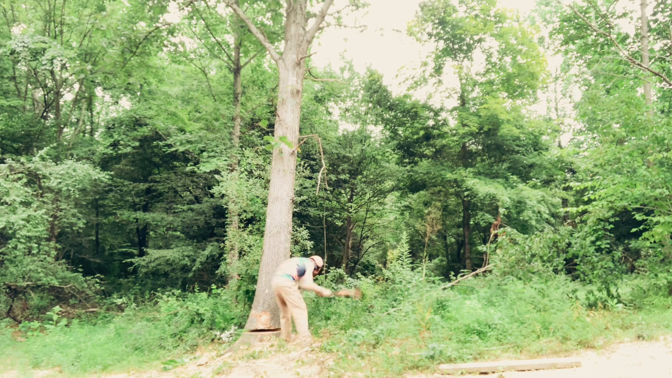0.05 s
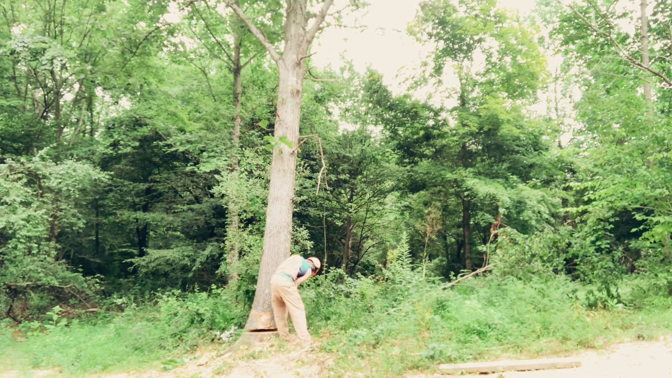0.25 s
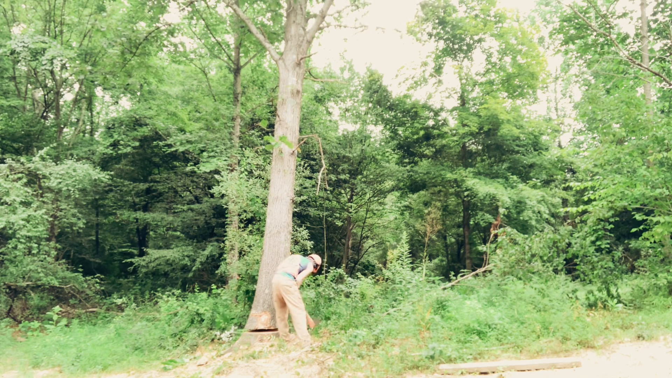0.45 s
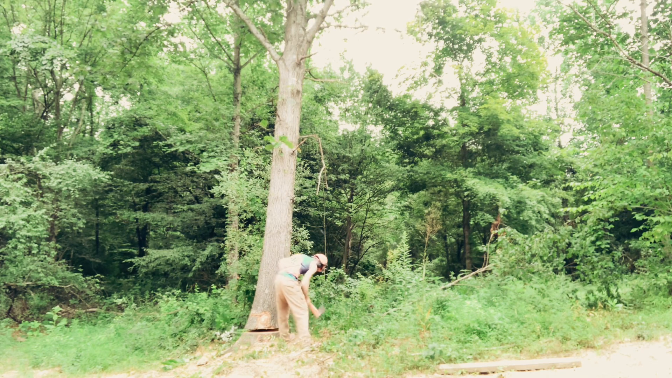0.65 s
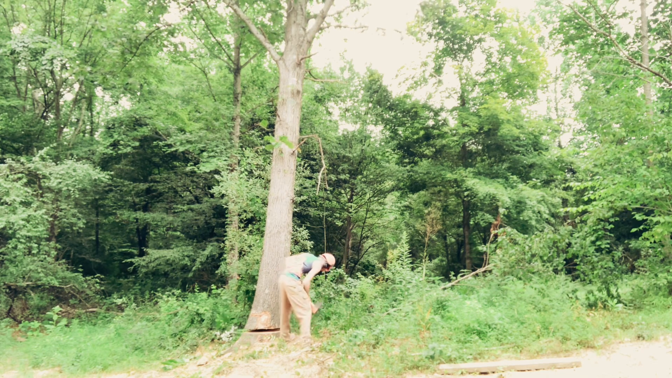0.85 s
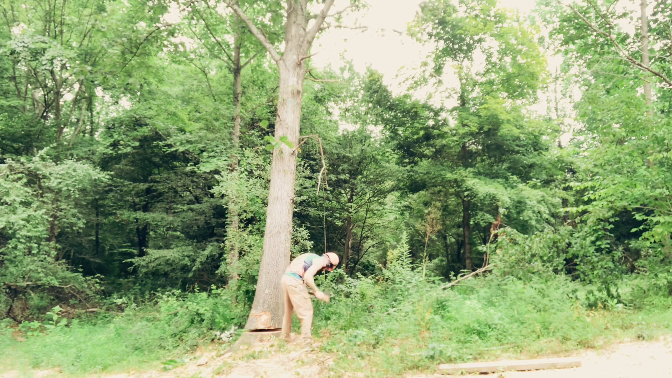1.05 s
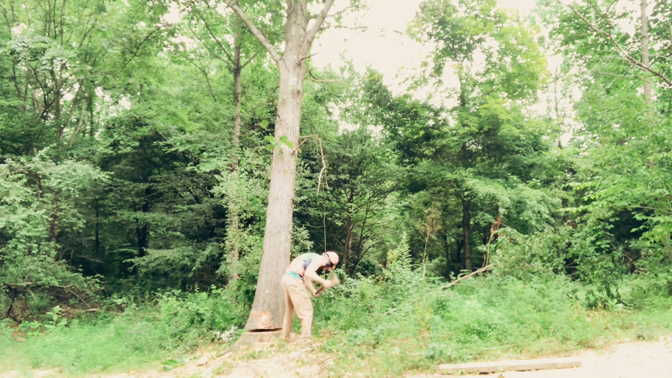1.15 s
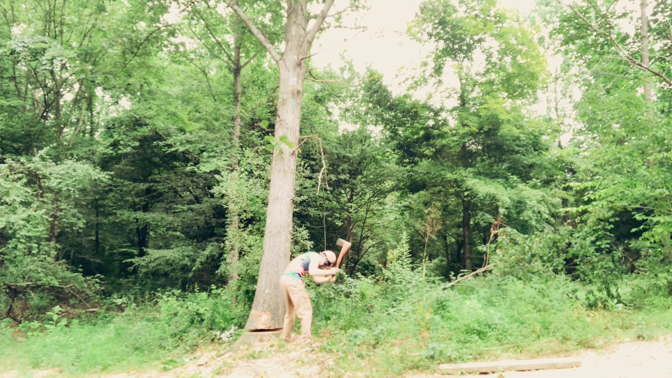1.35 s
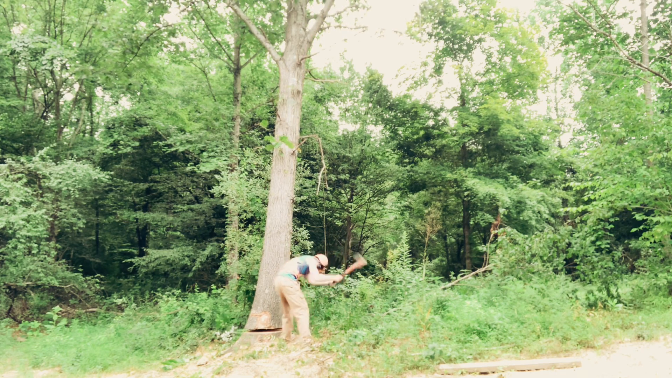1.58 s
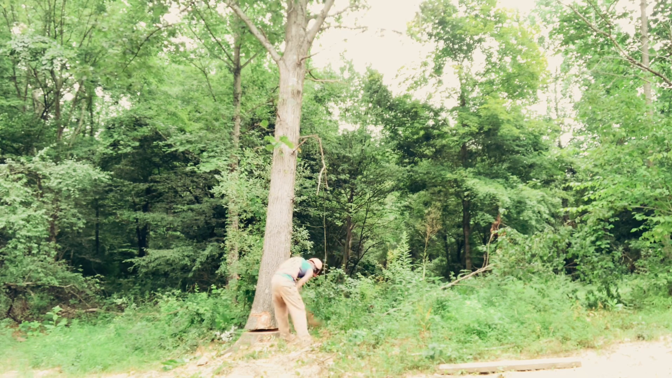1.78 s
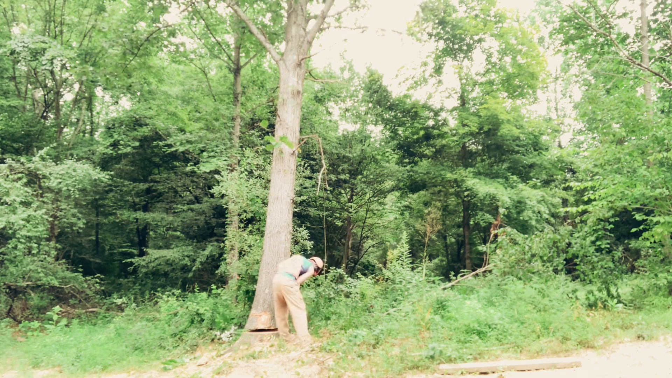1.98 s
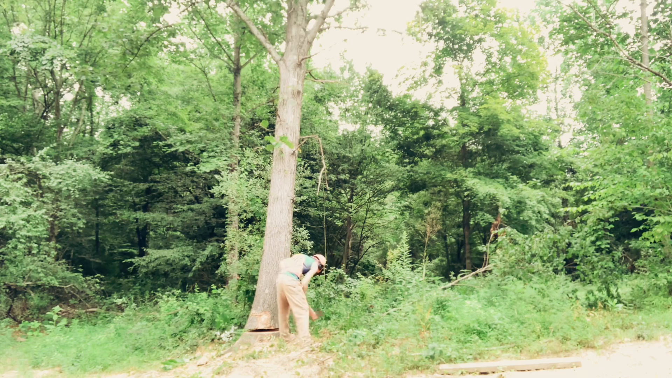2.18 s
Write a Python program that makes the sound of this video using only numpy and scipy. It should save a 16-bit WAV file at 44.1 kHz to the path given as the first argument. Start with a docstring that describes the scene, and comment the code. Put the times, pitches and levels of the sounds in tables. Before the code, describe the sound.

Hammer on a wedge in a tree at a wood's edge, heard from a distance. At 0.2 s a sharp steely crack and short woody knock, echo scattering through the trees. From 0.5 to 1.4 s faint rustling, small twig snaps and a hand sliding on the handle. A barely audible note at 1.6 s, second blow at 1.86 s, snaps near 2.1 s. Quiet low rumble throughout.

```python
"""Two hammer blows on a wedge in the cut of a tall tree at the edge of a wood, heard from some way off.
Each blow is a noisy steel tick, ringing steel and wood tones, and a long scattered echo made of fading noise.
Between the blows, grainy noise makes clothes and grass rustle, and noise in moving resonances makes a hand
slide on the handle; between and after the blows, short bursts make twigs or grass snap. A faint note comes
before the second blow. Under it all lies a quiet, patchy rumble of low-heavy noise."""
import sys
import numpy as np
from scipy import signal
from scipy.fft import rfft, irfft
from scipy.io import wavfile
from scipy.ndimage import uniform_filter1d

SR = 44100
rng = np.random.default_rng(int(sys.argv[2]) if len(sys.argv) > 2 else 0)


def wav_out(sig):
    """Save sig, one row per channel (or a flat mono array), as 16-bit PCM at SR to the path in sys.argv[1]."""
    wavfile.write(sys.argv[1], SR, np.round(np.clip(np.atleast_2d(sig).T, -1, 1) * 32767).astype(np.int16))


N = 97020  # samples, 2.2 s

# How alike left and right are in echo and rustle: f/Hz, likeness (1 same, 0 unrelated, -1 opposite)
ECHO_LIKENESS = [(60, 0.85), (180, 0.77), (550, -0.11), (1650, -0.45), (4970, 0.17), (15000, -0.14)]
# Tone colour of rustle and snaps: f/Hz, relative level per Hz/dB
RUSTLE_COLOUR = [(240, -18), (400, -3.5), (690, -11), (858, -3.5), (1750, -7.5), (2550, -14), (4260, -9.5),
                 (6090, -20), (8580, -5), (10000, -30.5), (11500, -10.5), (15300, -29), (16500, -36)]


def gain_of(db):
    """Turns decibels into a gain."""
    return 10 ** (np.asarray(db) / 20)


def evened(x):
    """Scales a sound to an rms of 1."""
    return x / np.sqrt(np.mean(x ** 2) + 1e-20)


def read(points, hz):
    """Reads a table between its rows, on a log-frequency axis."""
    f, value = np.transpose(points)
    return np.interp(np.log(hz + 1), np.log(f + 1), value)


def level(table):
    """Turns a table of times and decibels into a gain curve, silent outside the table."""
    rows = np.array(table)
    return gain_of(np.interp(np.arange(N) / SR, rows[:, 0], rows[:, 1], -200, -200))


def add(mix, start, sound):
    """Mixes a stereo sound in at a start time in seconds."""
    part = mix[:, round(start * SR):][:, :sound.shape[1]]
    part += sound[:, :part.shape[1]]


def hiss(colour, likeness, patchy_db, t60=None, size=512):
    """Stereo noise from random short-time spectra: rms 1, or fading from about there if t60 (s) is given."""
    hop = size // 4
    frames, hz = N // hop + 5, np.fft.rfftfreq(size, 1 / SR)
    a, b, c, d, patches = rng.standard_normal((frames, len(hz), 5)).T
    # Smoothing over 9 frequency bins and 7 frames makes louder and softer patches
    patches = uniform_filter1d(patches, size=9, axis=0)
    patches = evened(uniform_filter1d(patches, size=7, axis=1))
    alike = np.clip(read(likeness, hz), -1, 1)[:, None]
    left = a + 1j * b
    right = alike * left + np.sqrt(1 - alike ** 2) * (c + 1j * d)
    spectra = np.array([left, right]) * gain_of(read(colour, hz)[:, None] + patchy_db * patches)

    def to_sound(z):
        """Joins the overlapping short spectra into a waveform."""
        return signal.istft(z, nperseg=size, noverlap=size - hop)[1][:, :N]

    steady = to_sound(spectra)
    if t60 is None:
        return evened(steady)
    # Each frequency falls by 60 dB in its own time
    fade_db = -60 * np.arange(frames) * hop / SR / read(t60, hz)[:, None]
    return to_sound(spectra * gain_of(fade_db)) / steady.std()


def resonate(x, hz, width_hz):
    """A moving resonance: shift its pitch down to zero, smooth twice, shift back."""
    turn = np.exp(2j * np.pi * np.cumsum(hz * np.ones(N)) / SR)
    r = np.exp(-np.pi * width_hz / SR)
    smooth = signal.lfilter([(1 - r) ** 2], [1, -2 * r, r ** 2], x / turn)
    return 2 * (turn * smooth).real


def rumble():
    """A quiet, low-heavy, patchy noise that swells and sinks slowly."""
    # Tone colour: f/Hz, relative level per Hz/dB
    floor_colour = [(15, -51.5), (25, -22), (65, -4.5), (159, -16.5), (208, -14), (266, -15.5),
                    (617, -25.5), (746, -23.5), (1430, -28), (2600, -37.5), (9850, -39.5), (12900, -56),
                    (16500, -67.5)]
    # Left-right match: f/Hz, likeness from -1 to 1
    floor_likeness = [(60, 0.84), (180, 0.93), (550, 0.67), (1650, 0.36), (4970, -0.15), (15000, -0.07)]
    # Slow swell: t/s, level change/dB
    floor_swell = [(0, -6), (.6, 1), (1.2, 0.5), (1.5, -3.5), (2.2, 7)]
    noise = hiss(floor_colour, floor_likeness, patchy_db=4.0, size=2048)
    return gain_of(-61.5) * level(floor_swell) * noise


def tick(tick_db):
    """The dry crack of steel on the wedge: coloured noise that dies fast, partly shared by both sides."""
    # Tone colour: f/Hz, relative level per Hz/dB
    crack_colour = [(1500, -26.5), (2500, -4), (3100, -5), (4500, 0), (6800, -14.5), (8200, -2.5),
                    (9900, -16), (12000, -6.5), (14000, -16), (15100, -9.5), (16500, -27)]
    base_db, t60_s, rise_s = -17.5, .012, .0012
    likeness, left_lag_s = .9, .00009
    t, hz = np.arange(4096) / SR, np.fft.rfftfreq(4096, 1 / SR)
    a, b = rfft(rng.standard_normal((2, 4096)))
    left = a * np.exp(-2j * np.pi * hz * left_lag_s)
    right = likeness * a + np.sqrt(1 - likeness ** 2) * b
    crack = evened(irfft(np.array([left, right]) * gain_of(read(crack_colour, hz))))
    return crack * np.minimum(t / rise_s, 1) * gain_of(base_db + tick_db - 60 * t / t60_s)


def steel_ring(ear_times, ring_db):
    """The hammer head rings as high sine tones that fade quickly."""
    # Tones of the hammer head: f/Hz, level before the blow's ring setting/dB, time to fall 60 dB/s
    steel_tones = [(8190, -26, 0.0308), (8700, -31, 0.021)]
    return sum(gain_of(ring_db + db - 60 * ear_times / t60) * np.sin(2 * np.pi * hz * ear_times)
               for hz, db, t60 in steel_tones)


def wood_knock(ear_times, pitch, off_centre):
    """Wedge, trunk and ground sound as fading sine tones; the lowest swell most slowly."""
    # Tones: f before the pitch factor/Hz, level/dB, change when fully off-centre/dB,
    # time to fall 60 dB/s, swell time/s, left minus right/dB
    wood_tones = [(44, -33.5, -3, 0.46, .03, -1), (62, -33.5, 1, 0.44, .02, -1),
                  (72, -10.5, -1.5, 0.087, 0.0081, 0.5), (147.1, -10.5, -2, 0.071, 0.004, -1.5),
                  (237.4, -15, 3, 0.065, .005, 0.5), (346.6, -5, 2, 0.038, 0.0026, -2.5),
                  (480, -17, 2, 0.054, .003, 0.5), (633, -14.5, 6, 0.041, 0.00052, 0),
                  (784, -16, 7, 0.057, .001, -1), (977, -6.5, -4, 0.075, .001, 2.5),
                  (1150, -6.5, -3.5, 0.024, 0.00049, 4), (1223, -5, 3, 0.02, 0.00027, 3.5),
                  (1525, -16, -1.5, 0.039, 0.00029, -9), (1950, -17.5, -3, .04, .0004, 4),
                  (2400, -24.5, -4, 0.02, 0.0012, -3.5)]
    late = (ear_times - .001).clip(0)  # the wood answers 1 ms after the steel touches
    knock = 0
    for hz, db, shift_db, t60, swell_s, pan_db in wood_tones:
        side_db = np.array([[pan_db], [-pan_db]]) / 2
        fade = gain_of(db + off_centre * shift_db - 60 * late / t60 + side_db)
        swell = (1 - np.exp(-late / swell_s)) ** 2
        knock = knock + fade * swell * np.sin(2 * np.pi * hz * pitch * late)
    return knock


def wood_echo(echo_db, bright_db, treble_db):
    """Many overlapping reflections, heard as noise: near trunks fade soon, the deep wood slowly."""
    # Tone colours of near trunks and deep wood: f/Hz, relative level per Hz/dB
    near_colour = [(24, -38), (40, -5.5), (118, -10.5), (245, -5), (690, -11), (981, -4.5), (1060, -4),
                   (1990, -17), (2370, -22), (6660, -34), (8360, -27), (10200, -39), (12800, -30),
                   (13800, -75), (16500, -107)]
    far_colour = [(24, -41), (40, 1.5), (164, -10.5), (206, -15.5), (358, -3), (485, -20), (844, -1.5),
                  (1750, -9.5), (2370, -12), (3730, -21.5), (8570, -24.5), (10200, -39.5), (12500, -33),
                  (15300, -46), (16500, -61.5)]
    # Their fading: f/Hz, time to fall 60 dB/s
    near_t60 = [(60, 0.3), (150, .25), (300, 0.28), (1000, 0.44), (2000, 0.5), (4000, 0.65), (10000, 0.44)]
    far_t60 = [(60, 1.5), (200, 0.79), (400, 1.12), (1000, 1.73), (2400, 1.39), (4000, 1.05), (10000, 1.1)]
    # Left-right match of the near echo: f/Hz, likeness from -1 to 1
    near_likeness = [(60, 0.046), (180, 0.93), (550, 0.18), (1650, -0.18), (4970, -0.0), (15000, -0.36)]
    patchy_db, rise_s = 1.18, .006
    echo = gain_of(-16) * hiss(near_colour, near_likeness, patchy_db, near_t60)
    echo = echo + gain_of(-31.5) * hiss(far_colour, ECHO_LIKENESS, patchy_db, far_t60)
    # Each blow changes a band around 2340 Hz and the treble above about 3100 Hz
    hz = np.fft.rfftfreq(N, 1 / SR)
    bright_band = np.exp(-((hz - 2340) / 400) ** 2)
    treble = 1 / (1 + (3100 / (hz + 1)) ** 4)
    echo = irfft(rfft(echo) * gain_of(bright_db * bright_band + treble_db * treble), N)
    rise = (1 - np.exp(-np.arange(N) / SR / rise_s)) ** 2
    return gain_of(echo_db) * rise * echo


def blow(start, db, tick_db, ring_db, pitch, off_centre, echo_db, bright_db, treble_db):
    """One strike sets off the tick, the steel ring, the wood knock and the echo."""
    left_lag_s = .00012  # ring and knock reach the left side a little later
    t = np.arange(N) / SR
    ear_times = np.array([t - left_lag_s, t]).clip(0)
    sound = steel_ring(ear_times, ring_db) + wood_knock(ear_times, pitch, off_centre)
    sound = sound + wood_echo(echo_db, bright_db, treble_db)
    add(sound, 0, tick(tick_db))
    return start, gain_of(db) * sound


def rustle():
    """Cloth and grass: many tiny rubs, made as a patchy hiss broken into grains."""
    # Loudness: t/s, level/dB
    rustle_level = [(0.5, -82), (0.55, -60), (0.604, -66.5), (0.706, -58), (0.824, -72), (0.844, -67.5),
                    (0.916, -63.5), (0.958, -57), (1.014, -59.5), (1.032, -52.5), (1.306, -67.5),
                    (1.328, -70), (1.34, -62), (1.4, -67), (1.534, -80.5), (1.8, -90)]
    # A new random gain every 40 samples, smoothed over 60
    grains = gain_of(1.4 * rng.exponential(1, N // 40 + 1)).repeat(40)[:N]
    grains = uniform_filter1d(grains, size=60)
    noise = hiss(RUSTLE_COLOUR, ECHO_LIKENESS, patchy_db=-0.5, size=256)
    return level(rustle_level) * evened(grains * noise)


def snap(start, db, t60, tilt_db):
    """A dry snap: a short noise burst with the colour of the rustle, made duller or brighter."""
    rise_s = 0.0016
    t, hz = np.arange(8192) / SR, np.fft.rfftfreq(8192, 1 / SR)
    # The tilt turns around 4000 Hz and stays level below 800 Hz
    colour = gain_of(read(RUSTLE_COLOUR, hz) + tilt_db * np.log2(hz.clip(800) / 4000))
    noise = evened(irfft(rfft(rng.standard_normal((2, 8192))) * colour))
    return start, noise * np.minimum(t / rise_s, 1) * gain_of(db - 6 - 60 * t / t60)


def slide():
    """A hand rubs along the handle: noise in a moving resonance, with one brief thin high squeak."""
    # Path of the slide: t/s, level/dB, resonance f/Hz
    slide_path = [(.91, -89, 4100), (.955, -61, 4000), (1.0, -82, 3900), (1.3, -87, 4400),
                  (1.322, -68.5, 4300), (1.336, -55, 4200), (1.36, -53.5, 3830), (1.385, -57, 3700),
                  (1.4, -67, 3750), (1.44, -71, 3850), (1.471, -77, 3730)]
    squeak_s, squeak_length_s, squeak_db = 1.342, 0.015, -2
    times, _, resonance_hz = np.transpose(slide_path)
    noise, t = rng.standard_normal((2, N)), np.arange(N) / SR
    rub = evened(resonate(noise, np.interp(t, times, resonance_hz), width_hz=1340))
    brief = np.exp(-((t - squeak_s) / squeak_length_s) ** 2)
    squeak = brief * evened(resonate(noise, 8460, width_hz=600))
    return level(slide_path) * (rub + gain_of(squeak_db) * squeak)


def peep(start, length, hz, db):
    """A faint distant note: one short sine tone with a soft start and end."""
    t = np.arange(0, length, 1 / SR)
    arch = np.sqrt(np.sin(np.pi * t / length))
    return start, np.ones((2, 1)) * gain_of(db) * arch * np.sin(2 * np.pi * hz * t)


def scene():
    """Lays blows, snaps and the faint note over rumble, rustle and slide."""
    # Hammer blows: t/s, level change/dB, tick change/dB, steel ring change/dB, pitch factor,
    # off-centre 0-1, echo change/dB, its bright band change/dB, its treble change/dB
    blows = [(0.225, 1.5, 3.5, 0.5, .99, 0.5, -1.5, 5, 0.5), (1.8586, 0, 4, -7, 1.01, 1, -3, -4, -4.5)]
    # Dry snaps of twigs or grass: t/s, level (6 dB above the starting rms)/dB,
    # time to fall 60 dB/s, tilt/dB per octave
    snaps = [(0.5356, -45, 0.057, 0), (0.8454, -55, 0.091, 5), (1.0359, -43.5, 0.11, -2.5),
             (1.0813, -43.5, 0.052, 0), (1.1896, -46, 0.053, -1.5), (1.8121, -53, 0.11, 3.5),
             (2.0874, -34.5, 0.13, -2.5), (2.1177, -42, 0.15, -0.5)]
    # The faint note: t/s, length/s, f/Hz, level/dB
    note = (1.583, .05, 1450, -71)
    mix = rumble() + rustle() + slide()
    for row in blows:
        add(mix, *blow(*row))
    for row in snaps:
        add(mix, *snap(*row))
    add(mix, *peep(*note))
    return mix


def record(dry):
    """The microphone's bass cut below 38 Hz, then a limit on sound above 16800 Hz."""
    bass_cut = signal.butter(4, 38, "high", fs=SR, output="sos")
    cut = signal.sosfilt(bass_cut, dry)
    band_limit = signal.firwin(511, 16800, window=("kaiser", 9), fs=SR)
    return signal.oaconvolve(cut, band_limit[None], "same")


dry = scene()
out = record(dry)
wav_out(out)
```